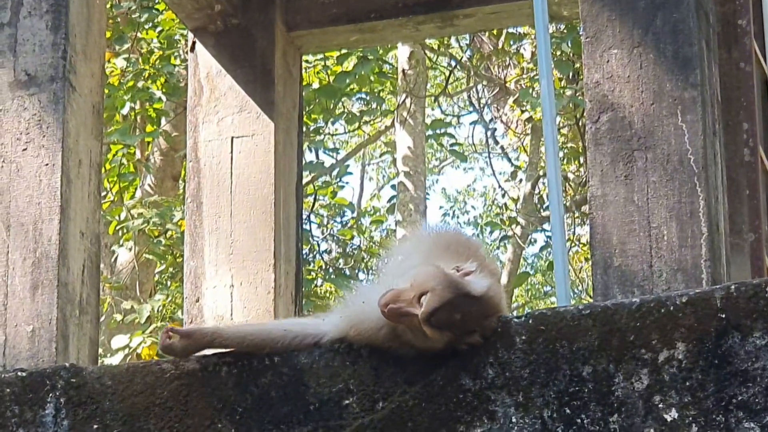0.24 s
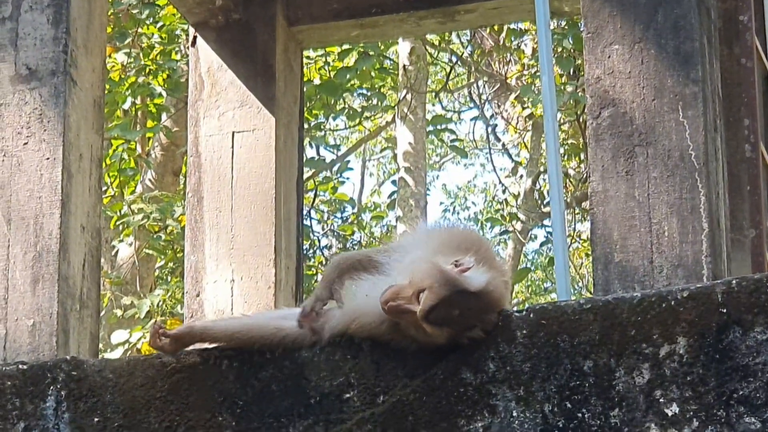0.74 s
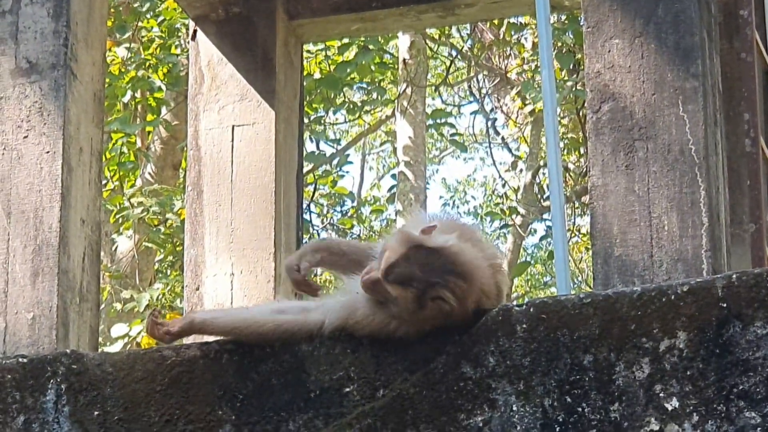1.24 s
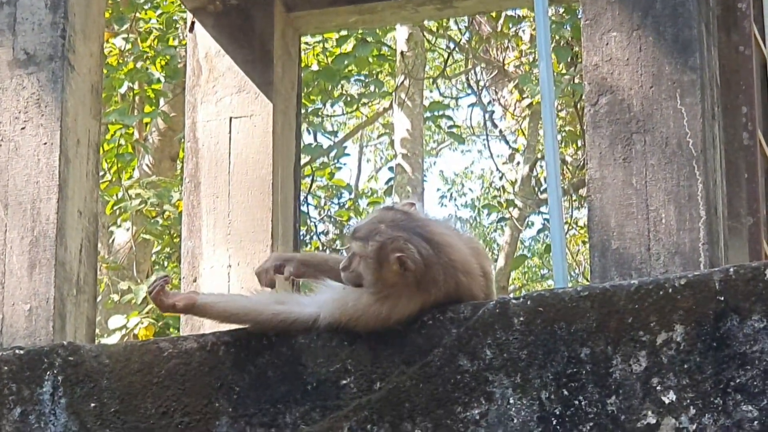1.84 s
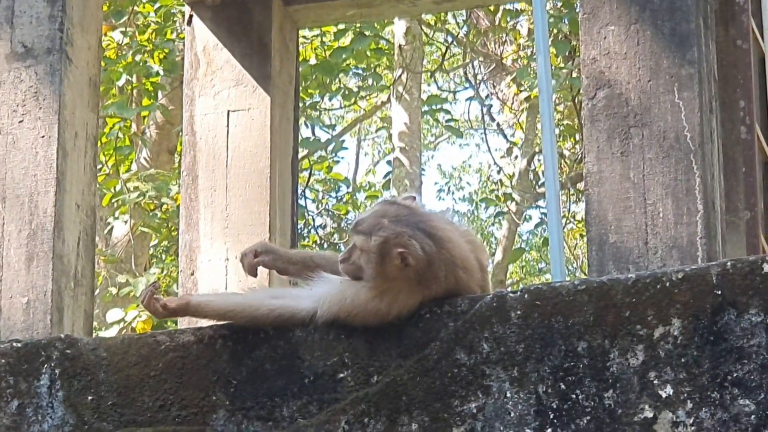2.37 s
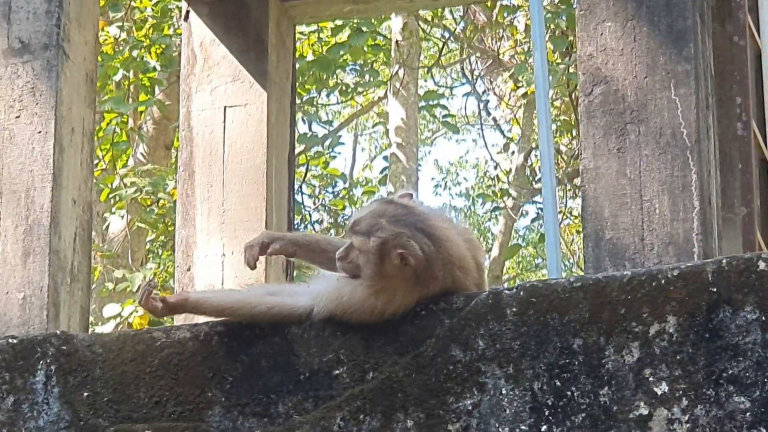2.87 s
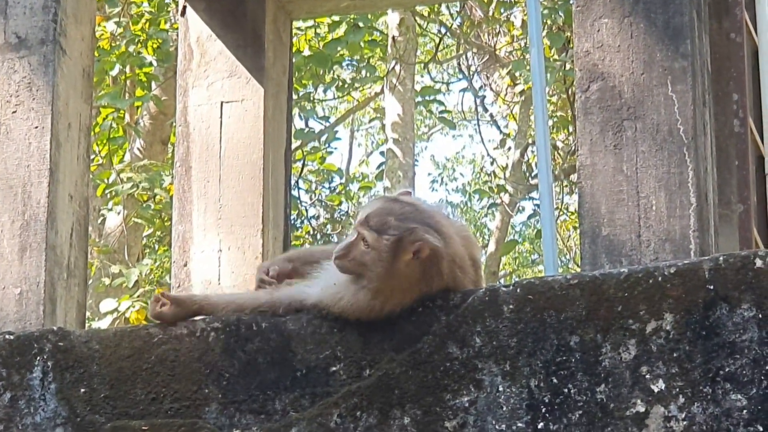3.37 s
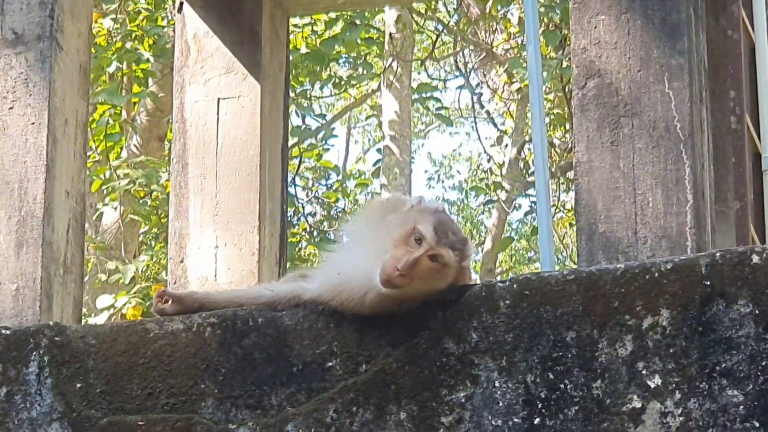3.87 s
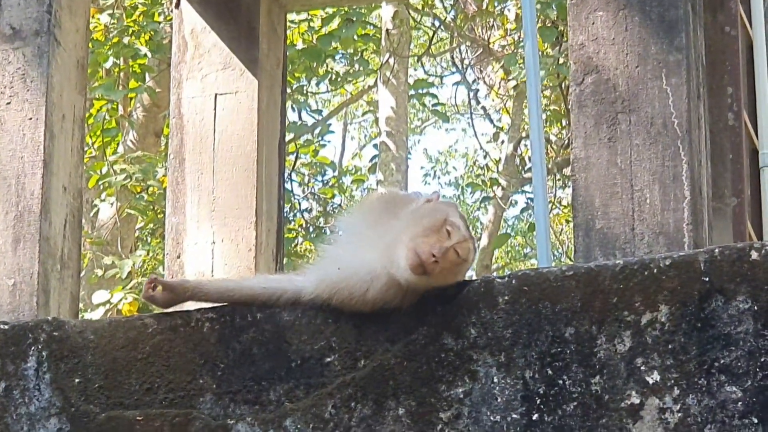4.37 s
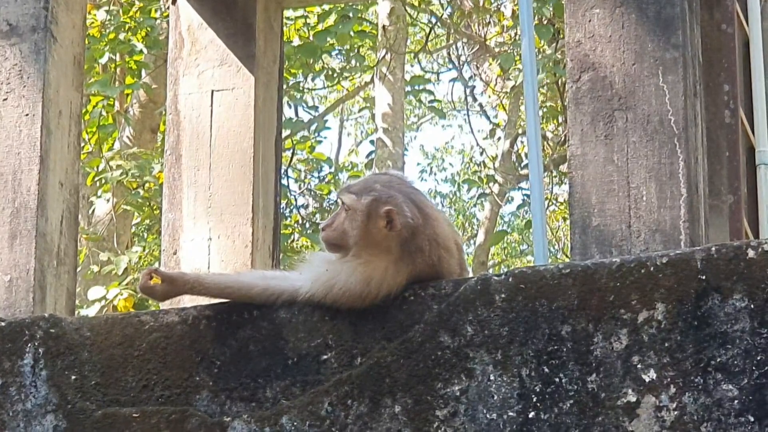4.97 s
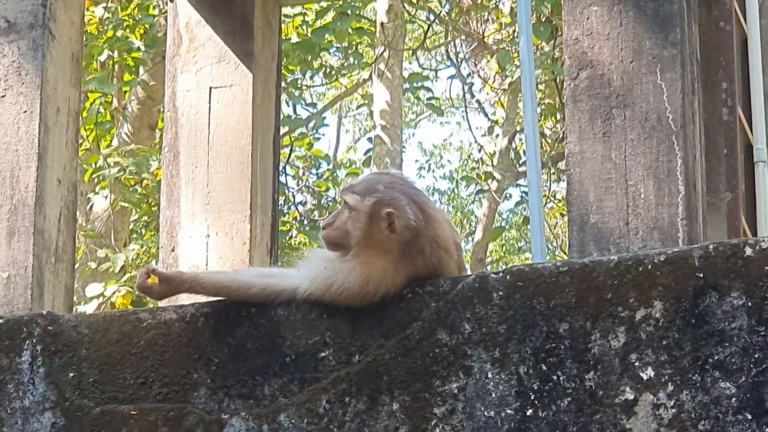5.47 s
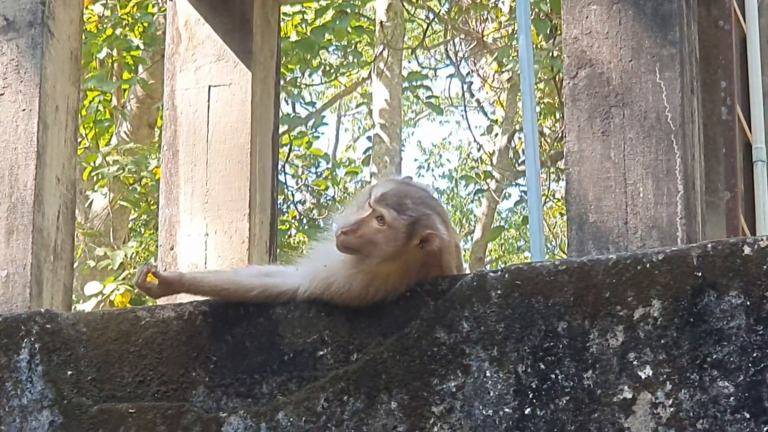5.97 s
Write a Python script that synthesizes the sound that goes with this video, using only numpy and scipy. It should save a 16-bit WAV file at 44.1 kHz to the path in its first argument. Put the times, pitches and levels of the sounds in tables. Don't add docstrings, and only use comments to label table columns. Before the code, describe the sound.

Outdoor woodland ambience heard by two closely spaced microphones: a steady low rumble of distant engines, thin airy hiss, and birds at varied distances left, right and ahead. A snappy downward chirp keeps returning, with upward slurs, reedy pipes, scoops and tiny high seeps around it. Calls become busier after four seconds, ending with clear notes and two mellow pipes. Reverberant and calm; the monkey on the ledge is silent.

```python
import sys
import numpy as np
from scipy import signal
from scipy.io import wavfile
from scipy.ndimage import uniform_filter1d

SR = 44100
rng = np.random.default_rng(int(sys.argv[2]) if len(sys.argv) > 2 else 0)


def how_loud(loudness_db):
    steps = np.asarray(loudness_db, float) / 20
    return 10 ** steps


def generate_wav(signal):
    frames = np.transpose(np.atleast_2d(signal))
    scaled = np.clip(frames, -1, 1) * 32767
    pcm = np.round(scaled).astype(np.int16)
    wavfile.write(sys.argv[1], SR, pcm)


N = 273861


def evened(x):
    return x / np.sqrt(np.mean(x ** 2) + 1e-20)


def read(points, hz):
    f, value = np.transpose(points)
    return np.interp(np.log(hz + 1), np.log(f + 1), value)


def add(mix, start_s, sound):
    part = mix[:, max(round(start_s * SR), 0):][:, :sound.shape[1]]
    part += sound[:, :part.shape[1]]


def drift(n, rate_hz):
    knots = rng.standard_normal(500)
    return np.interp(np.arange(n) / SR * rate_hz, np.arange(len(knots)), knots)


# pitch_hz, likeness (1 = identical)
MIC_LIKENESS = [(40, 0.93), (100, 0.98), (180, 0.85), (350, 0.71), (700, 0.21), (1400, 0.02),
                (16000, 0.033)]
# pitch_hz, left_minus_right_db
AMBIENCE_LEAN = [(60, 0.5), (180, -0.5), (550, -1.5), (1650, -3), (4970, 2.5), (15000, 3)]


def hiss(spectrum, size, patchy_db):
    frames = 4 * N // size + 5
    hz = np.fft.rfftfreq(size, 1 / SR)
    a, b, c, d, patches = rng.standard_normal((frames, len(hz), 5)).T
    patches = uniform_filter1d(patches, size=12, axis=0)
    patches = evened(uniform_filter1d(patches, size=16, axis=1))
    same = np.clip(read(MIC_LIKENESS, hz), -1, 1)[:, None]
    left = a + 1j * b
    right = same * left + np.sqrt(1 - same ** 2) * (c + 1j * d)
    z = np.array([left, right])
    z *= how_loud(read(spectrum, hz)[:, None] + patchy_db * patches)
    z *= how_loud(np.array([.5, -.5])[:, None] * read(AMBIENCE_LEAN, hz))[:, :, None]
    return evened(signal.istft(z, nperseg=size, noverlap=size * 3 // 4)[1][:, :N])


# time_s, pitch_hz, level_db
FIRING_TONE = [(0.0, 72.9, -55), (.4, 75, -45), (.95, 76.73, -40.5), (1.302, 77.25, -32.5),
               (1.55, 79.6, -45), (2.1, 80.2, -38), (2.4, 81.1, -46.5), (3.0, 79.5, -41.5),
               (3.2, 78.2, -51), (3.6, 76.9, -41), (3.9, 77.4, -55), (4.301, 77.5, -40.5), (4.6, 77, -80),
               (5.7, 75.5, -48.5), (6.2, 79.3, -37)]
# middle_s, length_s, pitch_hz, level_db
PASSING_DRONES = [(.5, 2.5, 88, -41.5), (.5, 1.9, 58, -42.5), (1.305, 0.25, 90.2, -38.5),
                  (1.722, 0.3, 88.8, -41.5), (3.188, 0.36, 85, -44), (3.6, 0.23, 87, -40),
                  (4.763, 0.46, 87.1, -41.5), (5.024, 0.1, 60, -34.5), (5.452, 0.57, 60, -40.5),
                  (6.1, 0.61, 45.9, -43), (3.1, 0.83, 42.37, -43)]


def engines(t):
    s, hz, db = np.transpose(FIRING_TONE)
    hz = np.interp(t, s, hz) * (1 + 0.01146 * drift(N, rate_hz=7.99))
    level_db = np.interp(t, s, db) + 1.4 * drift(N, rate_hz=7.6)
    out = how_loud(level_db) * np.sin(2 * np.pi * np.cumsum(hz) / SR)
    for middle, length, hz, db in PASSING_DRONES:
        wobble = 0.84 * drift(N, rate_hz=4.1)
        swell_db = db - 40 * ((t - middle) / length) ** 2
        out = out + how_loud(swell_db) * np.sin(2 * np.pi * hz * t + wobble)
    return np.sqrt(2) * out


# pitch_hz, density_db (per Hz)
RUMBLE_COLOUR = [(15, -44), (25, -40), (40, 0.5), (55, 6.5), (70, -1.5), (95, -0.5), (125, -3.5),
                 (170, -16), (260, -36), (340, -54.5)]
# pitch_hz, density_db (per Hz)
AIR_COLOUR = [(88, -35), (150, -6), (205, -9), (661, -14), (921, -18.5), (1120, -16), (1310, -19.5),
              (1750, -17), (2750, -16.5), (4470, -26.5), (6480, -22.5), (8680, -40), (9760, -67.5),
              (11400, -43.5), (15900, -40.5)]
# time_s, level_db
TRAFFIC_NEARNESS = [
    (0.0, 1),
    (1.3, 0.1),
    (2.3, 2.2),
    (3.0, 1.2),
    (4.1, -0.5),
    (4.9, 1.5),
    (6.2, -0.7),
]


def background():
    t = np.arange(N) / SR
    near_db = np.interp(t, *np.transpose(TRAFFIC_NEARNESS))
    rumble = hiss(RUMBLE_COLOUR, size=4096, patchy_db=1.7) * how_loud(-41 + 0.27 * near_db)
    air = hiss(AIR_COLOUR, size=1024, patchy_db=1.48)
    town = signal.lfilter(*signal.butter(1, 3000 / SR), air)
    haze = air - town
    return rumble + engines(t) + town * how_loud(-48 + near_db) + haze * how_loud(-51.0)


# pitch_hz, t60_s
GROVE_DECAY = [(1500, 0.62), (3000, 1.42), (6000, 0.98), (10000, 0.39)]
# delay_s, level_db
WALL_ECHOES = [
    (.011, -8.5),
    (0.021, -7),
    (.031, -14.5),
    (.047, -12),
    (.066, -24.5),
    (0.095, -29),
]


def trunks():
    taps = np.zeros((2, SR))
    at = np.arange(200, SR - 20, 20) + rng.integers(0, 20, (2, (SR - 201) // 20))
    np.put_along_axis(taps, at, rng.choice([-1., 1.], at.shape), 1)
    hz, t, z = signal.stft(taps, SR, nperseg=256)
    decay = how_loud(-60 * t / read(GROVE_DECAY, hz)[:, None])
    tail = signal.istft(z * decay, SR, nperseg=256)[1]
    song_band = signal.lfilter(*signal.butter(2, [.08, .2], "band"), tail[0])
    tail *= how_loud(1.44) / np.linalg.norm(song_band / .35)
    tail += 0.088 * tail[::-1]
    offsets = rng.integers(-30, 30, (len(WALL_ECHOES), 2))
    for (s, db), (late, skew) in zip(WALL_ECHOES, offsets):
        tail[[0, 1], round(s * SR) + late + np.array([skew, -skew]) // 5] += how_loud(db)
    return tail


def grove(x, paths):
    sway = 2 * np.pi * .43 * np.arange(N) / SR
    shares = np.cos(sway), np.sin(sway)
    return sum(signal.fftconvolve(x * share, path, axes=1)[:, :N] for share, path in zip(shares, paths))


def scatter():
    t = np.arange(1500) / SR
    hits = rng.random(1500) < .03
    copies = rng.standard_normal(1500) * hits * np.exp(-t / 0.01) * .1
    copies[0] = 1
    return copies[None] / np.linalg.norm(copies)


def sing(hz, levels_db, place, edge_s, flutter_db=3.0):
    lean_db, lead_ms, hoarse = place
    n = len(hz)
    hz = hz * (1 + 0.0043 * drift(n, rate_hz=50.4) + 0.0535 * hoarse * drift(n, rate_hz=330))
    turns = np.cumsum(hz) / SR + np.array([[.5], [-.5]]) * hz * lead_ms / 1000
    rasp_db = 5.0 * hoarse * drift(n, rate_hz=300)
    tone = 0
    for k, db in enumerate(levels_db, start=1):
        level_db = db + rasp_db + flutter_db * drift(n, rate_hz=70.4)
        tone = tone + how_loud(level_db) * np.sin(2 * np.pi * k * turns)
    edges = signal.windows.tukey(n, min(2 * edge_s * SR / n, 1))
    return np.sqrt(2) * tone * edges * how_loud([[lean_db / 2], [-lean_db / 2]])


def far_chorus():
    out = np.zeros((2, N))
    for when, pitch, bend, long, loud, side in rng.random((70, 6)):
        length = round((0.0344 + 0.16 * long) * SR)
        hz = 1900 * 3.7 ** pitch * np.linspace(1, .93 + 0.1 * bend, length)
        level_db = -64.0 - 8.0 * pitch - 13.0 * loud
        place = (5.3 * (side - .5), side - .5, .3)
        add(out, when * N / SR, sing(hz, [level_db], place, edge_s=0.033))
    return out


# start_s, length_s, pitch_hz, width_hz, level_db
BUZZ_EVENTS = [(0.0, 0.044, 7030, 1360, -71), (1.354, 0.13, 6030, 2440, -58), (1.64, 0.14, 6060, 650, -55),
               (1.934, 0.22, 6200, 1910, -60.5), (3.91, 0.27, 2870, 1150, -53.5),
               (4.058, 0.4, 8040, 750, -70.5), (4.39, .1, 3900, 1200, -53), (4.5, .28, 4700, 1000, -62),
               (4.45, 0.054, 6820, 1110, -56.5), (4.861, 0.37, 6010, 960, -64),
               (5.06, 0.16, 10800, 1950, -69.5)]


def buzzes():
    out = np.zeros((2, N))
    for s, length, hz, width_hz, db in BUZZ_EVENTS:
        n = round(length * SR)
        grains = rng.standard_normal((2, SR))[:, :n] * how_loud(3.9 * drift(n, rate_hz=100))
        band = signal.lfilter(*signal.butter(4, width_hz / SR), grains)
        climb = 1 + 0.01514 * np.linspace(-1, 1, n)
        carrier = np.cos(2 * np.pi * np.cumsum(hz * climb) / SR)
        add(out, s, how_loud(db) * evened(band * carrier) * signal.windows.tukey(n, .3))
    return out


def notes(rows, place, glide_s, rise_s, fade_db, throat=None):
    calls = []
    for s, length, first_hz, last_hz, db in rows:
        t = np.arange(0, length, 1 / SR)
        ease = np.sin(np.pi / 2 * np.minimum(t / min(glide_s, length), 1)) ** 2
        hz = first_hz + (last_hz - first_hz) * ease
        rise_db = 20 * np.log10(np.clip(t / rise_s, .01, 1))
        effort_db = db + fade_db * (t / length) ** 1.13 + rise_db
        levels_db = [effort_db]
        if throat:
            levels_db = [effort_db + read(throat, k * hz) for k in range(1, 6)]
        calls.append((s, sing(hz, levels_db, place, edge_s=0.0025, flutter_db=1.5 + 7.0 * place[2])))
    return calls


# start_s, length_s, first_hz, last_hz, level_db
SEEP_NOTES = [
    (1.05, 0.097, 8930, 8800, -82),
    (2.16, 0.069, 8250, 8000, -77),
    (2.375, .08, 6000, 6480, -56),
    (2.42, .035, 7500, 6600, -52),
    (2.49, 0.051, 9310, 9590, -82),
    (2.76, .05, 9170, 9100, -70),
    (3.62, 0.1, 5920, 6063, -66),
    (4.48, 0.25, 8450, 8300, -72.5),
    (5.52, .16, 8550, 8400, -77),
]


def seeps():
    return notes(SEEP_NOTES, (2.9, 0.023, 0.485), glide_s=0.053, rise_s=0.033, fade_db=-8.5)


# start_s, length_s, first_hz, last_hz, level_db
LEFT_NOTES = [
    (.22, 0.13, 2840, 2900, -65),
    (.545, .85, 1049, 1058, -65.5),
    (1.53, .035, 5200, 5100, -59),
    (2.6, .07, 5150, 5200, -60),
    (3.57, 0.12, 3310, 3305, -54.5),
    (4.04, .04, 2550, 2700, -54),
    (4.08, 0.035, 3030, 3010, -49),
    (4.26, 0.05, 3180, 3230, -54),
    (4.56, 0.056, 4970, 5030, -59),
    (4.65, 0.096, 4680, 4570, -65),
]


def left_whistles():
    return notes(LEFT_NOTES, (5, 0.022, 0.33), glide_s=0.32, rise_s=.012, fade_db=-8)


# start_s, length_s, first_hz, last_hz, level_db
RIGHT_NOTES = [(0.0, 0.057, 2378, 2145, -56), (.335, 0.029, 4810, 4700, -58),
               (.945, 0.025, 4583, 4040, -52), (2.12, 0.11, 2475, 2520, -52.5),
               (2.18, 0.05, 440, 435, -51.5), (3.24, 0.059, 3940, 3814, -50), (4.07, .035, 3500, 3480, -54),
               (4.14, 0.14, 2290, 2260, -62), (4.29, 0.053, 2190, 2074, -54.5),
               (5.01, 0.11, 3110, 3100, -59), (5.22, 0.088, 2870, 2850, -52)]


def right_whistles():
    return notes(RIGHT_NOTES, (-2, -0.039, .25), glide_s=.3, rise_s=0.012, fade_db=-1)


# start_s, length_s, first_hz, last_hz, level_db
FLUTE_NOTES = [
    (3.82, 0.11, 1710, 1725, -57.5),
    (3.915, 0.1, 1770, 1772, -50.5),
    (4.36, 0.054, 1664, 1632, -60.5),
    (4.58, 0.058, 1675, 1694, -52),
    (5.41, .145, 2160, 2095, -49),
    (5.618, .045, 2076, 2058, -40.5),
    (5.685, .042, 2004, 2026, -41.5),
    (5.74, .14, 2000, 1995, -64),
]
# pitch_hz, level_db
FLUTE_THROAT = [(2100, 3), (3480, -12), (4050, -24), (4200, -9), (4330, -24), (5220, -11), (6300, -17),
                (8400, -34)]


def flutes():
    return notes(FLUTE_NOTES, (-2, -0.034, 0.11), 0.074, 0.011, -6.5, FLUTE_THROAT)


# start_s, length_s, first_hz, last_hz, level_db
REED_NOTES = [
    (2.065, .09, 1890, 1946, -51),
    (2.155, .28, 1836, 1838, -63),
    (2.475, 0.086, 1830, 1955, -48.5),
    (2.64, 0.11, 1870, 1869, -56),
    (5.375, .17, 2600, 2935, -51),
]
# pitch_hz, level_db
REED_THROAT = [(1850, -2), (3750, -4.5), (5510, 6), (5630, -7), (5840, 4), (7500, -24), (8800, -21),
               (12000, -45)]


def reeds():
    return notes(REED_NOTES, (2, 0.051, 0.13), 0.065, .025, -8, REED_THROAT)


# start_s, length_s, first_hz, last_hz, level_db
SLUR_NOTES = [
    (.43, .14, 2394, 2403, -49.5),
    (.565, .14, 2404, 2875, -48),
    (.695, 0.134, 2864, 2834, -44),
    (.955, .08, 2882, 2920, -48),
]
# pitch_hz, level_db
SLUR_THROAT = [(2400, -3.5), (2870, 1), (4820, -10.5), (5740, -16), (7250, -28), (8600, -36.5),
               (12000, -55)]


def slurs():
    return notes(SLUR_NOTES, (6.1, .14, 0.12), .135, .008, -2.5, SLUR_THROAT)


# start_s, length_s, first_hz, last_hz, level_db
SCOOP_NOTES = [
    (2.705, 0.25, 2647, 3200, -38),
    (5.41, 0.26, 2930, 3294, -38.5),
]
# pitch_hz, level_db
SCOOP_THROAT = [(2600, 4.5), (3300, -4.5), (5200, 4), (6600, -21.5), (7800, -20), (9900, -45), (13000, -60)]


def scoops():
    return notes(SCOOP_NOTES, (.5, 0.082, 0.467), 0.069, 0.035, -22, SCOOP_THROAT)


# start_s, length_s, first_hz, last_hz, level_db
NEAR_NOTES = [
    (0.0, 0.17, 3630, 3607, -59),
    (2.56, .12, 2590, 2588, -43),
    (.895, 0.025, 2860, 2810, -57),
    (5.133, .064, 2930, 2940, -31.5),
    (5.21, 0.096, 2784, 2326, -39.5),
]


def near_bird():
    return notes(NEAR_NOTES, (-1.5, 0.012, 0.17), glide_s=.3, rise_s=0.0035, fade_db=-3.5)


# start_s, length_s, first_hz, last_hz, level_db
SINGER_NOTES = [
    (4.02, .08, 4810, 4860, -63),
    (4.1, 0.18, 4750, 4535, -54),
    (4.245, .08, 4130, 4070, -54),
    (4.325, .05, 4063, 4040, -42),
    (4.44, .095, 3120, 2870, -39.5),
    (4.535, 0.087, 2860, 2900, -41.5),
    (4.63, 0.188, 3007, 2900, -57.5),
]


def singer():
    return notes(SINGER_NOTES, (-.5, 0.058, 0.488), glide_s=.3, rise_s=0.0059, fade_db=-4.5)


# mid_fall_s, level_db, first_hz, last_hz, fall_s
CHIRP_CALLS = [
    (.365, -39.5, 4630, 1900, 0.024),
    (0.97, -42.5, 4900, 2250, 0.017),
    (1.563, -42.5, 4878, 2003, 0.026),
    (2.2, -41.5, 3970, 1856, 0.03),
    (2.75, -40.5, 3570, 1900, 0.032),
    (3.287, -40.5, 3982, 1940, 0.031),
    (3.834, -41.5, 4380, 1892, .027),
    (4.35, -40, 4060, 1900, 0.02),
    (4.864, -40.5, 4430, 2150, 0.024),
]
# left_minus_right_db, left_lead_ms, hoarseness (0-1)
CHIRP_PERCH = (-2.0, -.08, .55)


def chirps():
    windpipe = [(1900, -13), (2300, -5), (2650, 0), (2950, 3), (3300, .5), (3800, -9), (4500, -13)]  # Hz, dB
    mid_hz = 2900
    calls = []
    for s, db, first_hz, last_hz, fall in CHIRP_CALLS:
        snap = .55 * fall
        start = -snap * np.log((first_hz - last_hz) / (mid_hz - last_hz))
        t = np.arange(start, .048, 1 / SR)
        hz = last_hz + (mid_hz - last_hz) * np.exp(-t / np.where(t < 0, snap, fall))
        level_db = db + read(windpipe, hz)
        sound = sing(hz, [level_db, level_db - 22], CHIRP_PERCH, edge_s=.004, flutter_db=1.2)
        calls.append((s + start, sound))
    return calls


def scene():
    ground, wood, haze = background(), [trunks(), trunks()], scatter()
    straight = far_chorus() + buzzes()
    deep = straight.copy()
    birds = [(seeps(), .1), (left_whistles(), .1), (right_whistles(), .1), (flutes(), -0.5), (reeds(), -.1),
             (slurs(), -2.5), (scoops(), .1), (near_bird(), -6), (singer(), .1), (chirps(), 2.5)]
    for calls, wet_db in birds:
        for s, sound in calls:
            add(straight, s, sound)
            add(deep, s, how_loud(wet_db) * sound)
    heard = signal.oaconvolve(straight, haze, axes=1)[:, :N] + grove(deep, wood)
    return (how_loud(-1.0) * heard + ground) * signal.windows.tukey(N, .002)


def top_cut(x):
    return signal.sosfilt(signal.butter(12, 16530, fs=SR, output="sos"), x)


def record(dry):
    edge = signal.firwin(1023, 15760, window=("kaiser", 9), fs=SR)
    mix = signal.oaconvolve(dry, edge[None], "same")
    return top_cut(mix)


dry = scene()
out = record(dry)
generate_wav(out)
```